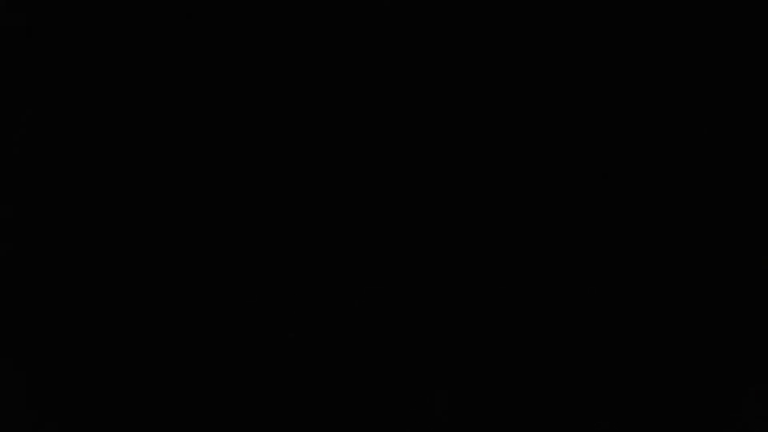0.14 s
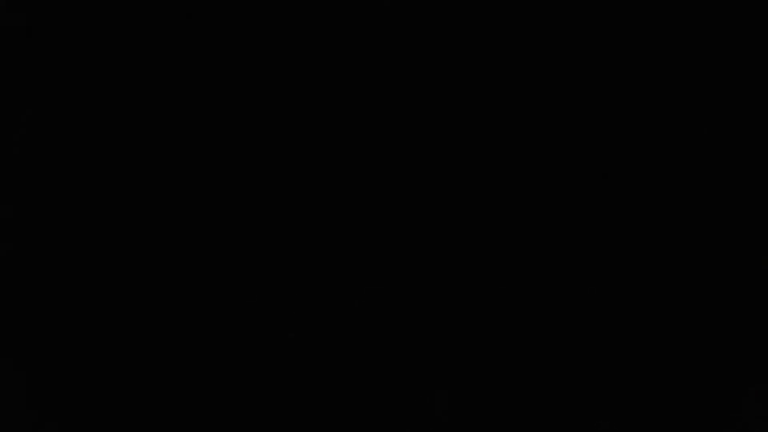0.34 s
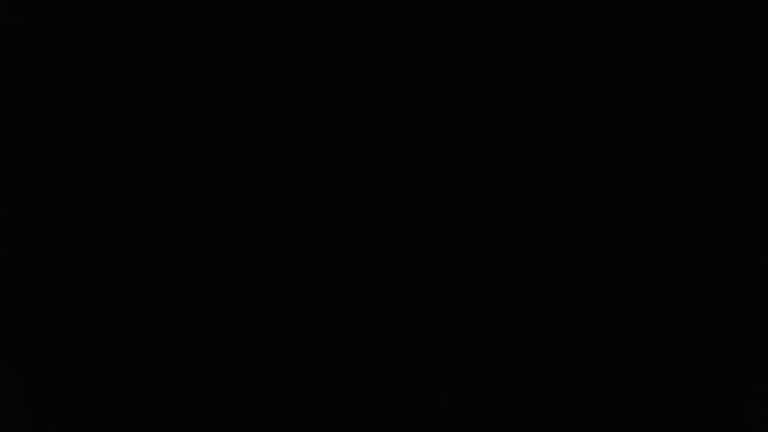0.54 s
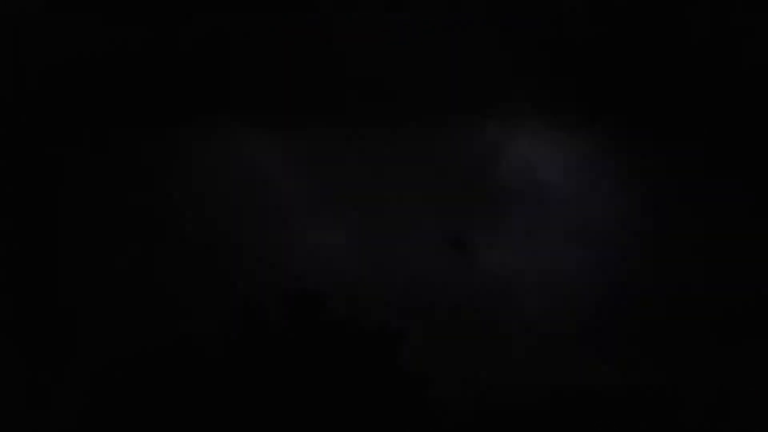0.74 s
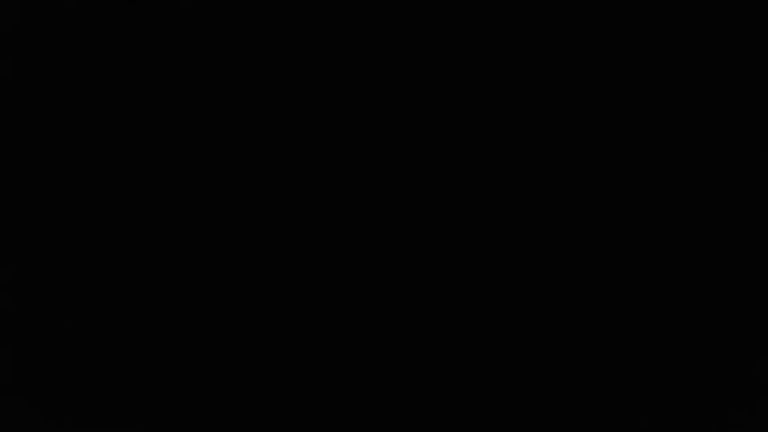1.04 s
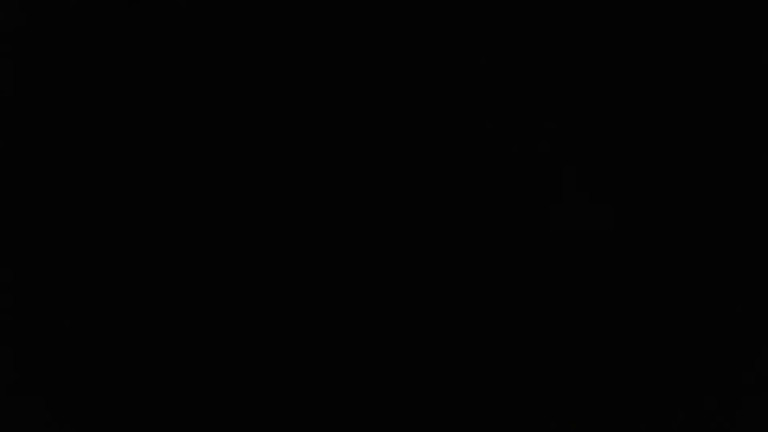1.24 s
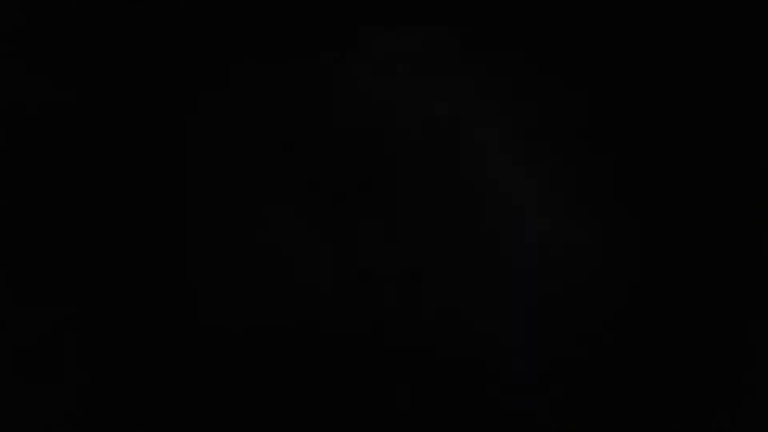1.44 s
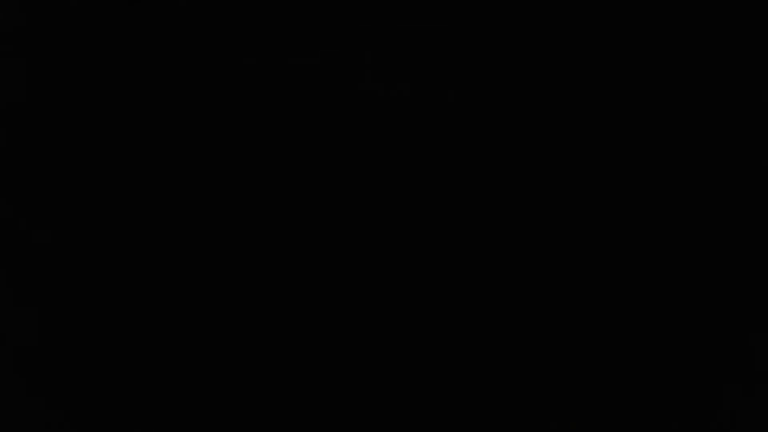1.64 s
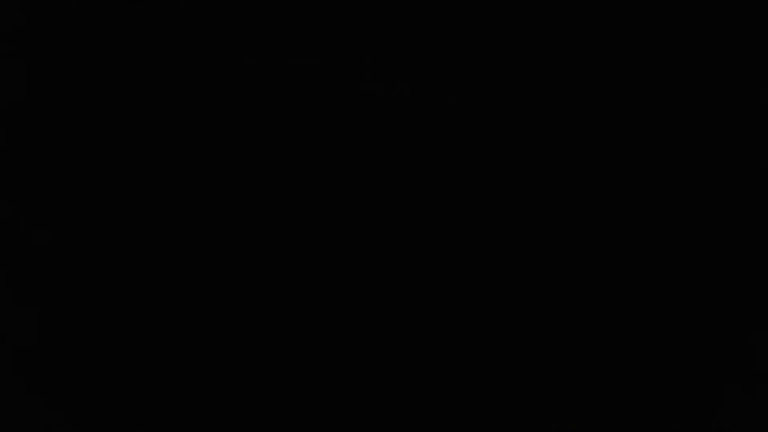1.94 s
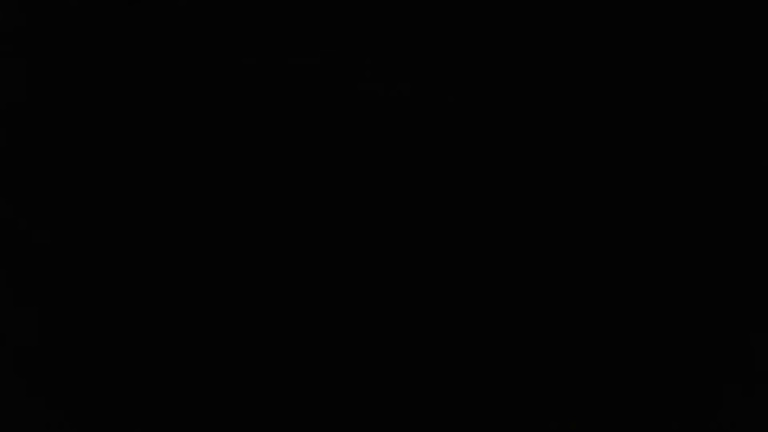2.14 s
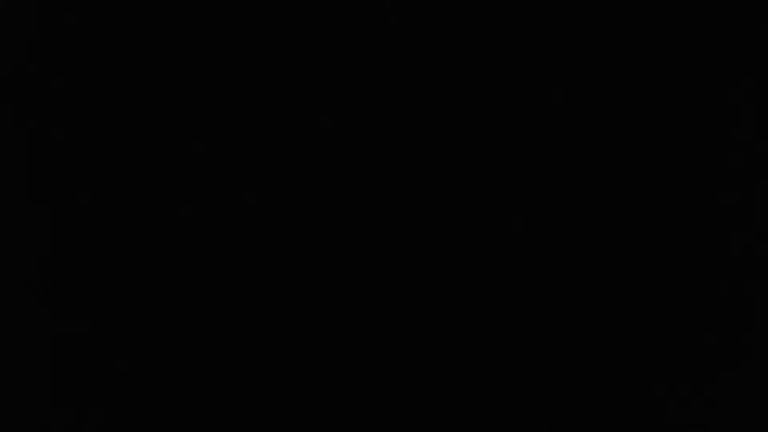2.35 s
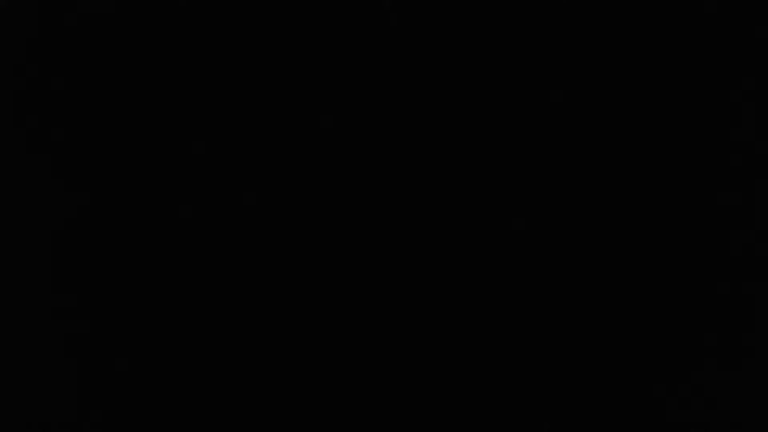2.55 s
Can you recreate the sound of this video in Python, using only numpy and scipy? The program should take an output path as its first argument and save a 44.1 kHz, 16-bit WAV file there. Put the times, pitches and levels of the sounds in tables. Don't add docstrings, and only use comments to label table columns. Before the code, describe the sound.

Low thunder rumbles without pause, with overlapping soft booms, strongest near the middle. Faint rain hisses around; a drop knocks early, then sharp ticks hit the left side of a handheld stereo microphone outdoors.

```python
import sys
import numpy as np
from scipy import signal
from scipy.io import wavfile
from scipy.ndimage import uniform_filter1d

SR = 44100
rng = np.random.default_rng(int(sys.argv[2]) if len(sys.argv) > 2 else 0)


def put_to_file(sound):
    columns = np.atleast_2d(sound).T
    safe = np.clip(columns, -1, 1)
    whole_steps = np.round(safe * 32767)
    wavfile.write(sys.argv[1], SR, whole_steps.astype(np.int16))


def gain_from_db(level_db):
    decades = np.asarray(level_db, float) / 20
    return 10 ** decades


N = 119070
T = np.arange(N) / SR
OPPOSITE = np.array([[1], [-1]])


def level(x, db):
    return x * gain_from_db(db) / np.sqrt(np.mean(x ** 2))


def band(x, hz, width):
    return signal.lfilter(*signal.iirpeak(min(hz, .45 * SR), hz / width, fs=SR), x)


def double_band(x, hz, width):
    return band(band(x, hz, width), hz, width)


def walk(rate):
    hold = int(SR / rate)
    held = np.repeat(rng.standard_normal(N // 100), hold)[:N]
    return 0.43 * uniform_filter1d(uniform_filter1d(held, hold), hold)


def scatter(rate, spread_db):
    present = rng.random(N) < rate / SR
    size = gain_from_db(spread_db * rng.exponential(size=N))
    return level(present * np.sign(rng.standard_normal(N)) * size, 0)


def ring(t0, hz, t60, rise):
    u = np.clip(T - t0, 0, 3 * t60)
    envelope = (1 - np.exp(-u / rise)) * gain_from_db(-60 * u / t60)
    return np.sin(2 * np.pi * hz * u) * envelope * (T - t0 < 3 * t60)


def pan(db):
    return gain_from_db(np.array([[db], [-db]]) / 2)


def ground_and_walls(drive, upper_gain):
    # f/Hz, bandwidth/Hz, level/dB
    modes = [(56, 23, -9), (108.2, 33, -5.5), (151.7, 44.6, -4.5), (179.6, 51.5, 1.5), (226.6, 56, -8.5),
             (309.6, 82, -7), (397, 135, -10.5), (580, 163, -22.5)]
    rows = []
    for hz, width, db in modes:
        rows.append(gain_from_db(db) * double_band(drive(width), hz, 1.37 * width) / np.sqrt(width))
    return level(sum(rows[:5]) + upper_gain * sum(rows[5:]), 0)


def thunder():
    # t/s, level/dB, nearness as level of the upper resonances/dB
    roll_course = [(0.0, -34.5, 1), (0.24, -36.5, 3.5), (0.4, -34, 0), (0.61, -33, 3), (.8, -34, 3.5),
                   (.95, -34.5, 1), (1.11, -34, 1.5), (1.3, -33.5, -0.5), (1.46, -33.5, 1.5),
                   (1.63, -33.5, -0.5), (1.8, -32, 0.5), (1.96, -32.5, -1), (2.1, -33.5, -1),
                   (2.22, -36.5, 1), (2.34, -34.5, -0.5), (2.47, -33, -4), (2.58, -33, -3),
                   (2.7, -32.5, -4.5)]
    # t/s, level/dB, f/Hz, t60/s
    booms = [(.025, -25.5, 316.7, .15), (.088, -26.5, 216, .12), (.10, -24.5, 333, 0.14),
             (.385, -28, 178, 0.22), (.39, -28.5, 309.4, 0.16), (.49, -26.5, 321.5, 0.19),
             (0.996, -21.5, 169.2, 0.18), (1.01, -26, 290.4, 0.17), (1.96, -27.5, 281, 0.19),
             (1.349, -22, 152, 0.1), (0.509, -23.5, 160.9, 0.28), (0.569, -19.5, 150, 0.1),
             (0.801, -22, 154.3, 0.23), (1.015, -16, 165, 0.19), (1.303, -10, 156, 0.16),
             (1.311, -22, 111.9, .3), (1.48, -28.5, 56, 0.32), (1.597, -17, 155, 0.076),
             (1.646, -22.5, 205.6, 0.14), (1.737, -19, 176.8, 0.22), (1.835, -23, 193, 0.094),
             (1.899, -33, 143, 0.46), (2.336, -21.5, 155, 0.27)]
    # t/s, level/dB, f/Hz, t60/s
    far_booms = [(2.425, -33, 51, .3), (1.315, -35, 48, .2), (0.5, -34, 92.6, 0.14), (1.5, -31.5, 155, .1),
                 (.68, -32.5, 179, 0.11), (1.9, -30.5, 74, 0.22), (.735, -36, 69, 0.17), (1, -38, 75, 0.17),
                 (1.862, -32.5, 71, .2), (2.1, -30, 74, .2), (2, -35.5, 75, .2), (2, -36, 76, .2),
                 (-0.4, -28.5, 102, 0.22), (.575, -28, 101, .15), (0.1, -31, 100, .15),
                 (1.1, -30.5, 103, 0.21), (1.8, -30, 120, 0.19), (2.8, -29.5, 110, .2),
                 (2.378, -30, 108, .2), (0, -29, 125, 0.17), (0.1, -27, 125, .15), (1.6, -20.5, 128, 0.14),
                 (1.65, -26, 138, .12), (2.04, -24.5, 125, .15), (1.965, -26, 125, .15),
                 (1.40, -27.5, 110, 0.15), (0.7, -24.5, 150.6, .12), (1.5, -28, 150, .12),
                 (2.015, -23, 179, 0.14), (1.445, -22, 180, .1), (.0, -24, 180, 0.091),
                 (0.8, -26.5, 226, 0.11), (1.8, -26, 232, 0.14), (0.8, -34, 400, .1),
                 (1.7, -30.5, 430, 0.096), (0.6, -34.5, 470, 0.12), (1.312, -36.5, 520, 0.09),
                 (2, -37.5, 540, 0.074)]
    t, db, near_db = np.array(roll_course).T
    strength = gain_from_db(np.interp(T, t, db))
    upper_gain = gain_from_db(np.interp(T, t, near_db))

    mid = strength * ground_and_walls(lambda width: scatter(15 * width, 1.8), upper_gain)
    mid = mid + sum(gain_from_db(g) * ring(s, hz, t60, rise=0.0053) for s, g, hz, t60 in booms)
    mid = mid + sum(gain_from_db(g + 6) * ring(s, hz, t60, rise=0.011) for s, g, hz, t60 in far_booms)
    side = strength * gain_from_db(-20.5) * ground_and_walls(lambda width: rng.standard_normal(N), upper_gain)
    return mid * pan(0.39) + side * OPPOSITE


def rain():
    # f/Hz, level per Hz/dB
    spectrum = [(250, 1.5), (600, -9.5), (950, -22.5), (1400, -20), (2300, -22), (4000, -31.5), (8500, -36),
                (10500, -41), (15500, -44)]
    # t/s, level/dB
    shower = [(0, -1), (.25, 1), (.8, 1), (1.1, -1.5), (1.25, 1), (1.45, -0.5), (1.7, -1), (2.0, 1),
              (2.25, -.5), (2.5, 1), (2.7, 0)]
    port_gap_m, sound_speed = .155, 343
    colour_hz, colour_db = np.array(spectrum).T
    swell = walk(2.7)
    drops = [scatter(3700, 3.5) for _ in range(2)]
    out = 0
    for hz in 250 * 2 ** np.arange(0, 6.1, 1 / 3):
        mid, side = (double_band(rng.standard_normal(N) + gain_from_db(-16) * d, hz, hz / 3) for d in drops)
        coherence = np.sinc((2 * hz * port_gap_m / sound_speed) ** 1.15)
        db = np.interp(np.log(hz), np.log(colour_hz), colour_db)
        db = db + 0.27 * swell + 3.6 * walk(14)
        ports = np.sqrt(1 + coherence) * mid + np.sqrt(1 - coherence) * side * OPPOSITE
        out = out + gain_from_db(db) * ports
    return level(out, -46) * gain_from_db(np.interp(T, *np.array(shower).T))


def splashes():
    # t/s, length/s, level/dB, f/Hz, pan/dB
    around = [(.0, 0.0025, -42.5, 1600, 2), (.0, 0.0027, -51, 9100, 0), (0.326, 0.029, -49.5, 1160, -3),
              (0.161, 0.023, -64, 4400, 4), (0.262, 0.023, -70, 8100, -4), (0.652, 0.019, -62.5, 4700, 5),
              (0.955, 0.016, -65, 6040, 2), (1.182, 0.03, -64, 7400, -1.5), (1.205, 0.016, -53.5, 1960, 0),
              (1.208, 0.013, -61, 7100, 0), (1.253, 0.011, -64.5, 7450, -9), (1.255, .035, -55.5, 1660, -3),
              (1.405, .015, -66.5, 7100, -1.5), (1.564, 0.018, -63, 7100, -1),
              (2.043, 0.013, -66.5, 4400, -4), (2.205, .012, -66, 3300, 0), (2.108, 0.022, -62, 4900, -2),
              (2.484, 0.0065, -60.5, 5660, -5), (2.491, 0.049, -61, 2050, -4),
              (2.523, 0.005, -59.5, 8950, 3), (2.616, .006, -66, 3000, 2), (2.615, .008, -61, 5700, -3),
              (2.665, 0.0062, -63, 4700, 6), (0, 0.0026, -49.5, 4200, 1), (.263, .012, -71, 12000, -4),
              (.953, 0.016, -64, 2500, 7), (1.18, .03, -66.5, 4900, 0), (1.21, .008, -60, 3900, 0),
              (1.208, 0.031, -52.5, 1040, -2), (1.437, 0.013, -58.5, 1090, 0), (1.968, .01, -58, 1600, -7),
              (2.134, .008, -66, 6500, 0.5), (2.212, .008, -66, 8000, 3), (2.316, .028, -70, 8300, -1),
              (2.447, .012, -58, 1900, -2), (2.483, 0.012, -54, 1100, 0), (2.695, 0.0059, -60, 8000, 0),
              (1.208, .005, -55, 2500, 1)]
    # t/s, length/s, level/dB, f/Hz, pan/dB
    on_ports = [
        (1.017, 0.066, -60, 4600, 15),
        (1.016, 0.07, -65, 7400, 14),
        (1.017, 0.022, -71, 12500, 9),
        (1.066, .02, -73, 10000, 9),
        (1.054, 0.0037, -71, 6700, -9),
    ]
    edge_s, tail_share, q = .001, 0.11, 1.9
    grain_db, grain_samples = 3, max(int(0.00058 * SR), 1)
    out = np.zeros((2, N))
    for t, length, db, hz, side_db in [*around, *on_ports]:
        start = int(t * SR)
        u = T[:8192][:N - start]
        fade = np.exp(-np.maximum(u - length, 0) / (edge_s + tail_share * length))
        gate = (1 - np.exp(-u / edge_s)) * fade
        noise = rng.standard_normal((3, 8192))
        grain = gain_from_db(grain_db * np.sqrt(grain_samples) * uniform_filter1d(noise[2], grain_samples))
        spray = double_band(noise[:2] * grain, hz, hz / q)
        out[:, start:start + len(u)] += level(spray, db)[:, :len(u)] * gate * pan(side_db)
    return out


def ticks():
    tick_times = [.9902, 1.0185, 1.0438, 1.0489, 1.0516, 1.0570, 1.05735, 1.0576, 1.0579]
    # level/dB, level of the low modes (thud)/dB, level of the high modes (brightness)/dB
    impacts = [
        (-37, -18, -3.5),
        (-38.5, 6, -10),
        (-21, -9, -5),
        (-36, 4, -11),
        (-19, -7, -1),
        (-20.5, -3.5, -15),
        (-14.5, -6.5, 7.5),
        (-17.5, 7, -19),
        (-37, -1, -9),
    ]
    # f/Hz, level/dB, t60/s
    low_modes = [(1420, 1, 0.0019), (2400, -4, 0.0008)]
    mid_modes = [(4370, 0, 0.0025)]
    high_modes = [(8720, 3.5, 0.0014), (11640, -5.5, 0.0012), (14200, -13, 0.0015)]

    def strike(t, modes):
        return sum(gain_from_db(g) * ring(t, hz, t60, rise=5e-5) for hz, g, t60 in modes)

    left = np.zeros(N)
    for t, (db, low_db, high_db) in zip(tick_times, impacts):
        hit = gain_from_db(low_db) * strike(t, low_modes)
        hit = hit + strike(t, mid_modes)
        hit = hit + gain_from_db(high_db) * strike(t, high_modes)
        left = left + gain_from_db(db) * hit
    return np.array([left, 0 * left])


def knocks():
    # t/s, level/dB, f/Hz, t60/s, pan/dB
    knock_modes = [(0.3219, -28, 1160, 0.0068, 1), (.3215, -23, 1700, 0.003, -1),
                   (.3217, -42, 3100, 0.002, -3), (1.254, -46, 1620, 0.031, 4),
                   (.342, -42.5, 870, 0.019, 0), (.3222, -38.5, 2370, 0.01, -11),
                   (.3235, -36.5, 720, 0.046, 0), (0.3273, -29, 1220, 0.0092, -2),
                   (0.3331, -36, 880, 0.012, -1), (.3345, -33, 1450, 0.014, -2),
                   (0.407, -50, 1660, 0.11, 0), (0.684, -39.5, 1210, 0.029, 4)]
    return sum(gain_from_db(db) * ring(t, hz, t60, rise=0.00028) * pan(side_db)
               for t, db, hz, t60, side_db in knock_modes)


def whistle():
    # t/s, f/Hz, level/dB
    glide = [(2.45, 9450, -100), (2.47, 9400, -75), (2.5, 9250, -77), (2.53, 8650, -80), (2.56, 8400, -75),
             (2.63, 8150, -76), (2.7, 7900, -74)]
    t, hz, db = np.array(glide).T
    pitch = np.interp(T, t, hz) * (1 + .008 * walk(200))
    phase = 2 * np.pi * np.cumsum(pitch) / SR
    return gain_from_db(np.interp(T, t, db) + 7 * walk(60)) * np.sin(phase) * pan(2.5)


def scene():
    return thunder() + rain() + splashes() + ticks() + knocks() + whistle()


def low_pass(x):
    return signal.sosfilt(signal.butter(12, 15760, fs=SR, output="sos"), x)


def record(dry):
    # f/Hz, bandwidth/Hz, share removed/1
    port_dips = [(10700, 1500, .55), (9900, 2000, .45)]
    ports = np.array([x - share * band(x, hz, width) for x, (hz, width, share) in zip(dry, port_dips)])
    ports = signal.sosfilt(signal.butter(2, 32, "high", fs=SR, output="sos"), ports)
    ports = signal.sosfilt(signal.butter(10, 15900, fs=SR, output="sos"), ports)
    return low_pass(ports)


dry = scene()
out = record(dry)
put_to_file(out)
```